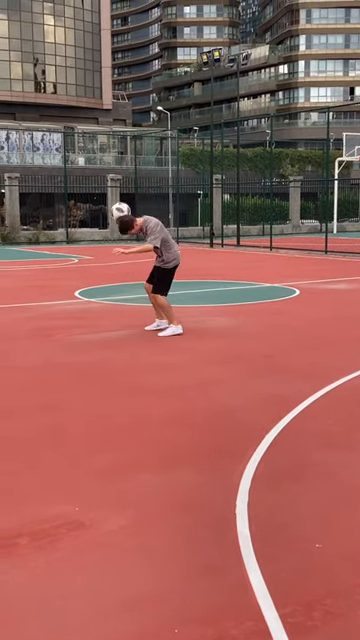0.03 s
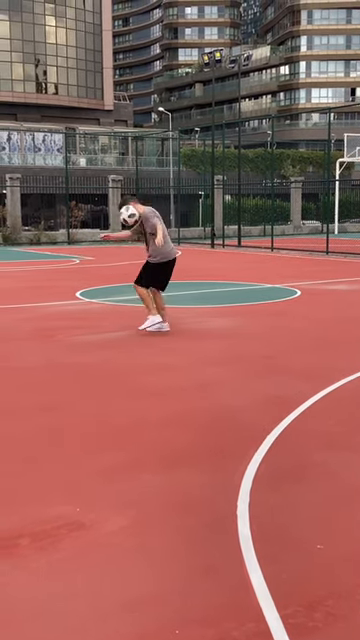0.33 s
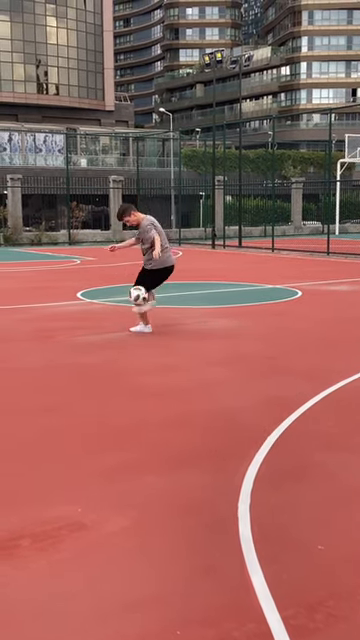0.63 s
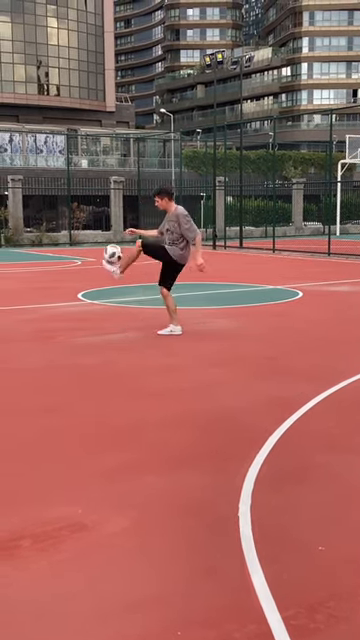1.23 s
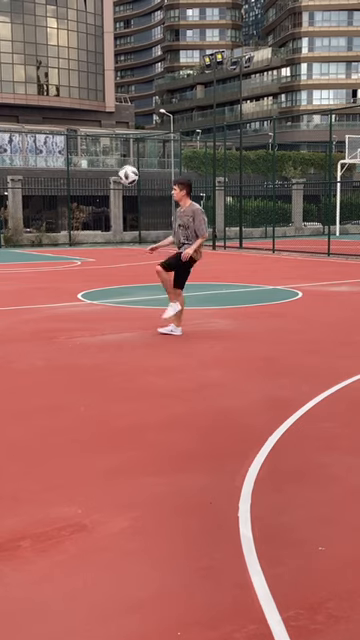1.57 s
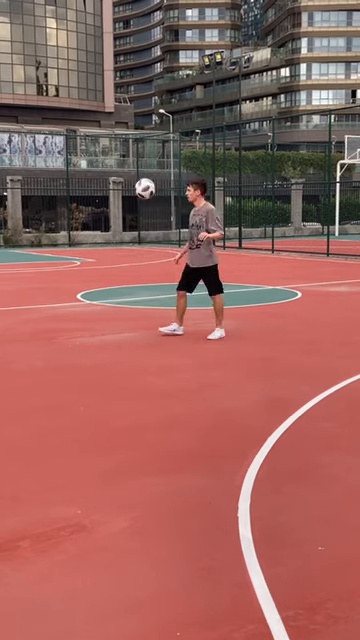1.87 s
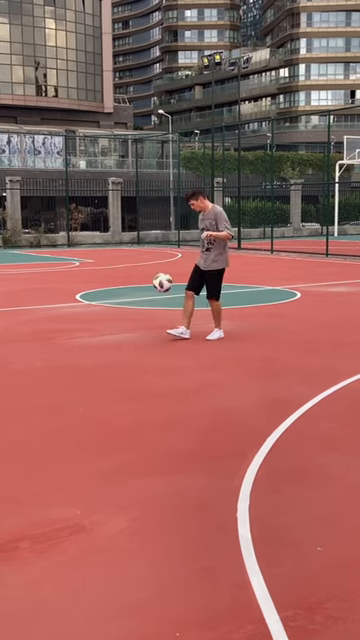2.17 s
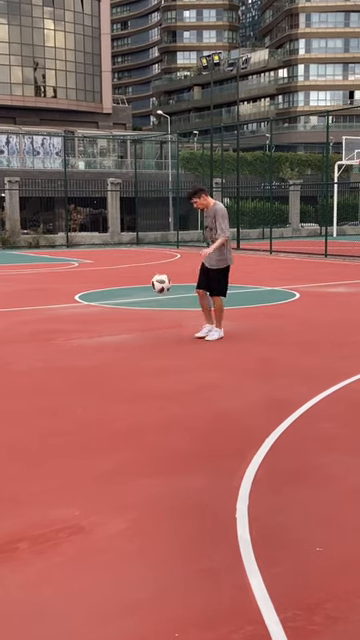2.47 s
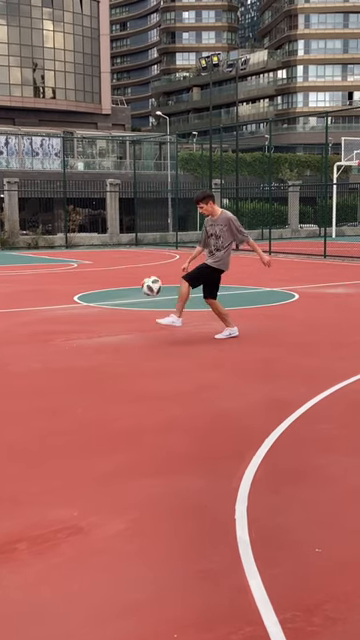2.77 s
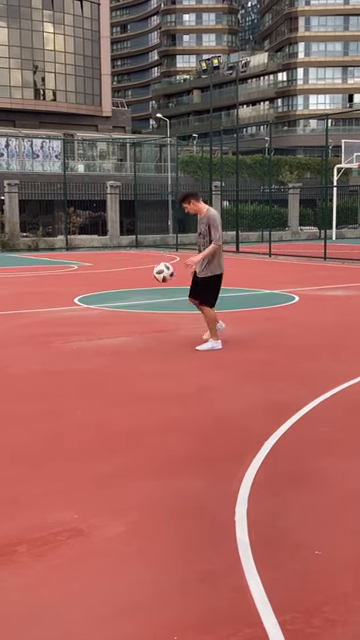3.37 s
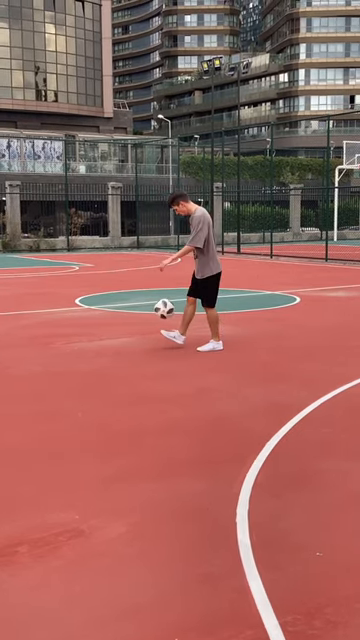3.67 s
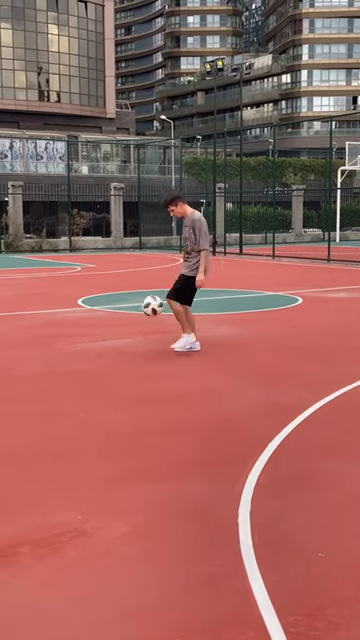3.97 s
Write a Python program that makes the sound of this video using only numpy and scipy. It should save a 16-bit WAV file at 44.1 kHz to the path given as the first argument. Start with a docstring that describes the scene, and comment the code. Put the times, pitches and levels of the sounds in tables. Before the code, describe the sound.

Several metres from the microphone, a foot taps a football twice in quick succession, then three more times at a slower pace. Soles scrape softly on the gritty outdoor court, and far city traffic hums throughout.

```python
"""Distant traffic rumbles round an outdoor court among tall buildings, with a faint ringing like far crickets.
Several metres ahead of a stereo microphone, a football is juggled. Each touch is a slap of the shoe,
a crack of the flexing casing, a short ring of the air inside and a low thump. Soles scuff over grit,
and ground, fence and walls scatter the player's sound. Far motors hum in the roar of the city;
near the end a thin swish comes up on the right."""
import sys
import numpy as np
from scipy import signal
from scipy.fft import rfft, irfft
from scipy.io import wavfile

SR = 44100
rng = np.random.default_rng(int(sys.argv[2]) if len(sys.argv) > 2 else 0)


def int16_out(signal):
    """Quantize to a 16-bit WAV file."""
    q = np.round(np.clip(np.atleast_2d(signal).T, -1, 1) * 32767)
    wavfile.write(sys.argv[1], SR, q.astype(np.int16))


N = 176400
T = np.arange(N) / SR
HZ = np.maximum(np.arange(N // 2 + 1) * SR / N, 1)

# shoe on ball: start_s, slap_db, contact_s, crack_db, ring_db, pitch_hz, skin_db, thump_db, thump_delay_s
TOUCHES = [(.949, -52, 0.0016, -44.5, -51, 870, -39.5, -28.5, 0.006),
           (1.225, -52, .003, -42.5, -34.5, 1167, -36, -28, .0054),
           (2.272, -47, 0.0011, -45.5, -37, 880, -40, -29, 0.0083),
           (2.845, -49, 0.0022, -47, -46, 934, -41.5, -26, 0.0103),
           (3.575, -49, .002, -69, -40, 1120, -35, -37, 0.0042)]
# air in the ball: pitch_ratio, gain_db, t60_s
BALL_MODES = [(.7, -1, 0.037), (1.0, -1.5, 0.047), (1.22, -5.5, 0.061), (1.6, -12, 0.081),
              (2.3, -19, 0.016)]
# shoe's slap and casing's crack: frequency_hz, gain_db
SLAP_SPECTRUM = [(1500, -1), (3000, 4), (4500, -5.5), (5700, 1), (7500, -2), (9800, 1.5), (12000, -20.5),
                 (14000, -7), (16000, -6.5)]
CRACK_SPECTRUM = [(700, -7), (1300, -1), (2100, 1), (3000, -13), (4200, -13), (5400, -9), (7000, -29),
                  (10000, -40)]
# soles on the court: start_s, attack_s, hold_s, t60_s, hiss_db, rasp_db
SCUFFS = [(0.357, 0.049, 0.007, 0.039, -53.5, -50.5), (0.507, 0.0092, .008, 0.065, -72, -80),
          (0.955, 0.013, 0.013, .055, -59, -54.5), (1.715, 0.0073, .009, 0.099, -63, -61),
          (2.335, .01, .012, .1, -74, -66), (2.516, 0.0078, 0.048, 0.097, -54, -69),
          (2.533, .02, 0.013, 0.068, -62, -52), (3.112, 0.0072, .008, .03, -50, -54),
          (3.116, 0.013, 0.012, .02, -54.5, -41.5), (3.814, 0.0057, .008, 0.086, -55, -58)]
# light and heavy rub of a sole: frequency_hz, gain_db
HISS_SPECTRUM = [(3000, 2), (4500, -1), (5700, -2), (7000, 2), (8800, 2), (10500, -1.5), (12000, -12.5),
                 (13500, -2.5), (16000, -8.5)]
RASP_SPECTRUM = [(700, -19.5), (1350, -4), (1600, 10.5), (1900, -3.5), (2400, -2.5), (2900, 2.5),
                 (3700, 4.5), (4400, -1.5), (5200, -4), (6500, -7), (8000, -25)]
# city roar, the hiss above it and the swish: frequency_hz, gain_db
TRAFFIC_SPECTRUM = [(20, -42), (32, -21.5), (42, -10), (56, 2), (70, -3.5), (92, -1.5), (125, -0.5),
                    (165, -5), (205, -7.5), (320, -8), (410, -12), (500, -18.5), (680, -15.5), (920, -15),
                    (1200, -19.5), (1550, -20), (1850, -23), (2100, -28.5), (3100, -34.5), (4100, -39),
                    (5000, -45.5), (5800, -56.5), (7000, -53.5), (16000, -99)]
AIR_SPECTRUM = [(4000, -13.5), (5700, -0.5), (6600, 4), (8500, -3), (10000, -8.5), (11500, -17.5),
                (14000, -15.5), (16000, -33)]
SWISH_SPECTRUM = [(1300, -14), (1850, 1.5), (2150, 3), (2400, -4.5), (2850, -0.5), (3150, -20), (4500, -23),
                  (7000, -60)]
# borders between the roar's four bands: edge_hz
BAND_EDGES = [75, 200, 1100]
# slow swell of each band: time_s, gain_db
DEEP_SWELL = [(0, 1), (.35, 2.5), (.8, -6), (1.5, 0.5), (2.3, 2.5), (2.85, 2), (3.15, -2.5), (3.6, 4),
              (4, -4)]
BASS_SWELL = [(0, 1), (.3, 2.5), (1.0, -1), (1.6, 0.5), (2.0, 3), (2.5, -3.5), (3.6, -1), (4, -5)]
MID_SWELL = [(0, 0.16), (.5, -0.12), (.85, -0.69), (1.55, -0.33), (2.6, -0.8), (3.45, 1.4), (4, 0.56)]
TYRE_SWELL = [(0, 0.26), (.9, 1.25), (1.7, 0.24), (2.9, -0.13), (3.5, 0.53), (4, 1.5)]
# rise and fall of high hiss, far engine and swish: time_s, level_db
AIR_LEVEL = [(0, -75.5), (.8, -79), (1.5, -79.5), (1.9, -77.5), (2.2, -75), (2.75, -80.5), (3.3, -77),
             (3.7, -75), (4, -75.5)]
ENGINE_LEVEL = [(0, -49), (.4, -43), (1.0, -41), (1.5, -56), (2.5, -44), (3.2, -51), (3.6, -45), (4, -51)]
SWISH_LEVEL = [(3.3, -82.5), (3.68, -57), (4, -53)]
# far motors: start_s, attack_s, hold_s, t60_s, pitch_hz, level_db
HUMS = [(0.18, 0.19, 1.4, 1.8, 373, -54.5), (0.55, 0.25, 1.2, 2.5, 320, -50),
        (0.27, 0.17, 1.1, 2.4, 427, -58.5), (.4, 0.2, 0.45, 2.2, 138, -47)]
# cricket-like tones: pitch_hz, list of (time_s, level_db)
CRICKETS = [(3896, [(0, -65), (.35, -74), (.5, -64), (.8, -64), (.95, -69), (1.45, -73), (1.85, -83),
            (3.0, -79), (3.35, -67), (3.6, -76), (4, -73)]), (3979, [(0, -72.5), (.25, -64.5), (.65, -78),
            (1.1, -65), (1.4, -74), (1.65, -67), (1.95, -83), (2.9, -76), (3.3, -71), (3.65, -74),
            (3.95, -65)]), (4021, [(0, -82), (.5, -67), (.8, -82), (1.8, -78.5), (2.3, -74), (2.6, -74),
            (3.05, -78), (4, -90)]), (4103, [(0, -84), (1.7, -80), (2.15, -76), (2.7, -80), (3.3, -75),
            (4, -79)])]
# how alike the city sounds left and right: frequency_hz, correlation
CITY_CORRELATION = [(50, 1), (130, 1), (250, 1), (400, 0.9), (700, 0.59), (1150, 0.38), (1600, 0.79),
                    (2200, 0.1), (3200, 0.4), (4400, 0.067), (5600, 1), (8000, 1), (14000, 1)]
# which way the city leans: frequency_hz, left_minus_right_db
CITY_BALANCE = [(60, -0.5), (130, 0.5), (290, 2.0), (640, 1.5), (1410, 0.0), (3100, -3), (6820, 1),
                (15000, -1)]
# phase between the microphone ports, before it is eased in the bass: frequency_hz, left_lead_rad
PORT_PHASE = [(150, 1), (300, -1.07), (1000, 0), (1500, 0.08), (2000, -0.85), (2900, -1.6), (3300, -3),
              (3700, -4.5), (4450, -5), (5150, -4), (5900, -3), (6500, -2.02), (7700, -1), (9500, 1.5),
              (12000, 2.5), (14000, 6.5), (16000, 8)]


def ball():
    """Shoe meets ball: a slap, the casing cracks flat and flexes, a thump, the air inside rings."""
    out, slap, crack = np.zeros(N), noise(SLAP_SPECTRUM), noise(CRACK_SPECTRUM)
    for start, slap_db, contact, crack_db, ring_db, pitch, skin_db, thump_db, thump_delay in TOUCHES:
        ring_start = start + .001
        out += from_db(slap_db) * slap * envelope(start, attack=.0005, hold=contact, t60=.012)
        out += from_db(crack_db) * crack * envelope(start + .0008, attack=.0005, hold=.002, t60=.016)
        out += from_db(skin_db) * ring(ring_start, hz=297, t60=.071)
        out += from_db(thump_db) * ring(start + thump_delay, hz=118, t60=.075)
        for k, (ratio, gain_db, t60) in enumerate(BALL_MODES):
            out += (-1) ** k * from_db(ring_db + gain_db) * ring(ring_start, pitch * ratio, t60)
    return out


def shoes():
    """Soles slide over grit: a light hiss, and a lower rasp under weight."""
    out, hiss, rasp = np.zeros(N), grit(HISS_SPECTRUM), grit(RASP_SPECTRUM)
    for start, attack, hold, t60, hiss_db, rasp_db in SCUFFS:
        rub = from_db(hiss_db) * hiss + from_db(rasp_db) * rasp
        out += envelope(start, attack, hold, t60) * tread(rub)
    flutter_db = .5 * drift(rate_hz=110)
    return out * rms_one(from_db(flutter_db))


def grit(spectrum, grains_per_s=1600, grain_db=5.5):
    """A smooth rub with single grains snapping under the sole; rms 1."""
    grains = rms_one(rng.standard_normal(N) * (rng.random(N) < grains_per_s / SR))
    friction = rng.standard_normal(N) + from_db(grain_db) * grains
    return coloured(friction, spectrum)


def tread(rub, ripple_db=5.5, spacing_hz=120):
    """Chance resonances of the tread, new for every step."""
    peaks = rng.standard_normal(1024)
    ripple = np.interp(HZ / spacing_hz, np.arange(len(peaks)), peaks)
    return irfft(rfft(rub) * rms_one(from_db(ripple_db * ripple)), N)


def court(direct, level_db=-14, cutoff_hz=11000):
    """Faint, duller scatter reaches the microphone from ground, fence and walls."""
    tail = rng.standard_normal((2, N)) * envelope(0, attack=.009, hold=0, t60=.36)
    tail /= np.sqrt(np.sum(tail ** 2, axis=1, keepdims=True))
    tail = signal.sosfilt(signal.butter(2, cutoff_hz, fs=SR, output="sos"), tail)
    return from_db(level_db) * signal.fftconvolve(direct[None], tail, axes=1)[:, :N]


def traffic():
    """Distant city roar in four bands that swell on their own, with a thin hiss on top."""
    roar = rfft(from_db(-38.5) * wide_noise(TRAFFIC_SPECTRUM))
    out = gain_curve(AIR_LEVEL) * wide_noise(AIR_SPECTRUM)
    for edge_hz, swell in zip(BAND_EDGES, (DEEP_SWELL, BASS_SWELL, MID_SWELL)):
        band = roar / (1 + (HZ / edge_hz) ** 8)
        out += irfft(band, N) * gain_curve(swell)
        roar -= band
    return out + irfft(roar, N) * gain_curve(TYRE_SWELL)


def engine():
    """The drone of a far engine comes and goes in the roar."""
    return gain_curve(ENGINE_LEVEL) * np.sin(wandering_phase(90.06, spread_hz=2.77, rate_hz=6.7))


def motors():
    """Far motors hum up out of the roar and sink back."""
    out = np.zeros(N)
    for start, attack, hold, t60, pitch, level_db in HUMS:
        hum = np.sin(wandering_phase(pitch, spread_hz=2.4, rate_hz=8.4))
        out += from_db(level_db) * envelope(start, attack, hold, t60) * hum
    return out


def swish(left_lag_s=.00011):
    """A thin swish off to the right reaches the left port late."""
    right = gain_curve(SWISH_LEVEL) * noise(SWISH_SPECTRUM)
    return np.array([np.interp(T - left_lag_s, T, right), right])


def crickets(path_rad=.35, waver_db=1.2):
    """Thin tones like far crickets swell in turn, reaching each port by its own path."""
    out = np.zeros((2, N))
    for pitch, level in CRICKETS:
        phase = wandering_phase(pitch, spread_hz=3, rate_hz=30)
        for port in range(2):
            tone = np.sin(phase + path_rad * drift(rate_hz=24))
            waver = from_db(waver_db * drift(rate_hz=24))
            out[port] += gain_curve(level) * rms_one(tone * waver)
    return out


def wide_noise(spectrum):
    """Coloured noise from all around, partly alike left and right; rms 1."""
    mid, side = rfft(rng.standard_normal((2, N)))
    alike, sign = at_hz(CITY_CORRELATION), np.array([[1], [-1]])
    pair = np.sqrt(1 + alike) * mid + sign * np.sqrt(1 - alike) * side
    gain_db = at_hz(spectrum) + sign * at_hz(CITY_BALANCE) / 2
    return rms_one(irfft(pair * from_db(gain_db), N))


def noise(spectrum):
    """Coloured noise of rms 1."""
    return coloured(rng.standard_normal(N), spectrum)


def coloured(x, spectrum):
    """Filter by a spectrum table; rms 1."""
    return rms_one(irfft(rfft(x) * from_db(at_hz(spectrum)), N))


def ring(start, hz, t60):
    """One struck mode, 60 dB down after t60 seconds."""
    t = np.maximum(T - start, 0)
    return np.sin(2 * np.pi * hz * t) * from_db(-60 * t / t60)


def envelope(start, attack, hold, t60):
    """Attack, hold and exponential release, all in seconds."""
    t = T - start
    rise = np.clip(t / attack, 0, 1) ** 2
    return rise * from_db(-60 * np.maximum(t - attack - hold, 0) / t60)


def wandering_phase(pitch_hz, spread_hz, rate_hz):
    """Phase in radians of a tone whose pitch strays."""
    return 2 * np.pi * np.cumsum(pitch_hz + spread_hz * drift(rate_hz)) / SR


def drift(rate_hz):
    """Smooth random motion of rms 1."""
    return rms_one(irfft(rfft(rng.standard_normal(N)) / (1 + (HZ / rate_hz) ** 2), N))


def gain_curve(points):
    """A table of decibels over time as a gain at every sample."""
    return from_db(np.interp(T, *np.transpose(points)))


def at_hz(points):
    """A spectrum table at every frequency."""
    hz, value = np.transpose(points)
    return np.interp(np.log(HZ), np.log(hz), value)


def from_db(db):
    """Decibels to gain."""
    return 10 ** (np.asarray(db) / 20)


def rms_one(x):
    """Scale to rms 1."""
    return x / np.sqrt(np.mean(x ** 2) + 1e-20)


def scene():
    """The player several metres straight ahead, the city all around."""
    player = ball() + shoes()
    return player + court(player) + traffic() + swish() + engine() + motors() + crickets()


def record(dry, alike_below_hz=350, stopband_hz=16400):
    """The microphone's two ports differ in phase above the bass; the top is cut steeply."""
    phase = at_hz(PORT_PHASE) * HZ ** 2 / (HZ ** 2 + alike_below_hz ** 2)
    impulse = irfft(np.exp(1j * np.array([[1], [-1]]) * phase / 2), N)
    kernel = np.roll(impulse, 256, axis=1)[:, :513] * np.hanning(513)
    ports = signal.fftconvolve(dry, kernel, "same", axes=1)
    return signal.sosfilt(signal.cheby2(16, 60, stopband_hz, fs=SR, output="sos"), ports)


dry = scene()
out = record(dry)
int16_out(out)
```